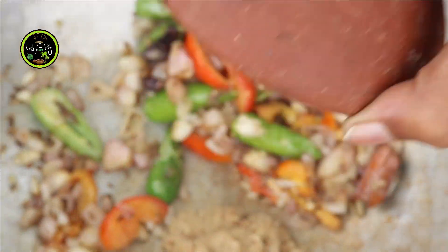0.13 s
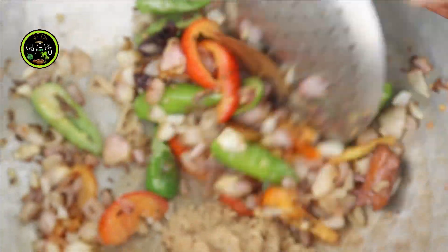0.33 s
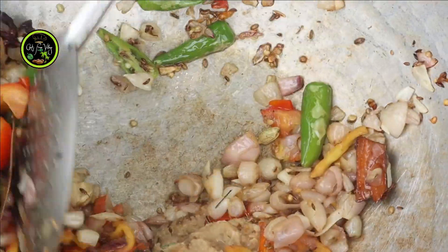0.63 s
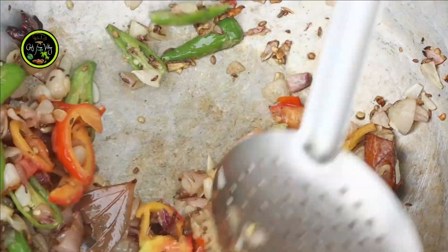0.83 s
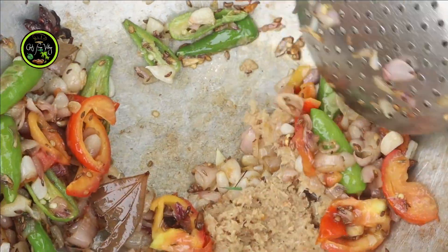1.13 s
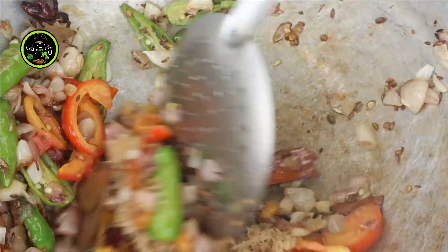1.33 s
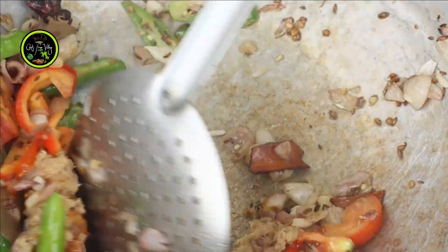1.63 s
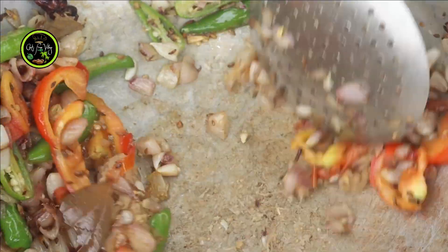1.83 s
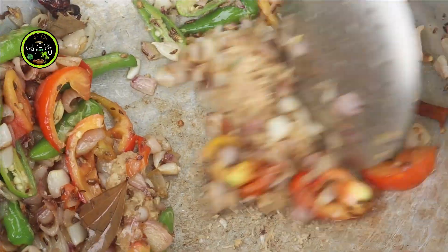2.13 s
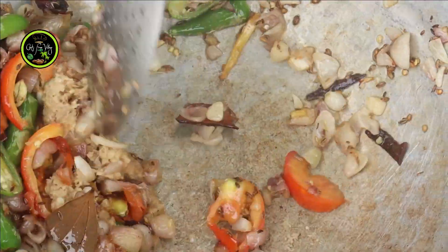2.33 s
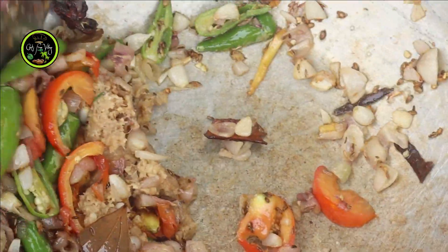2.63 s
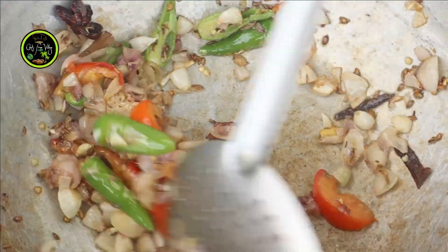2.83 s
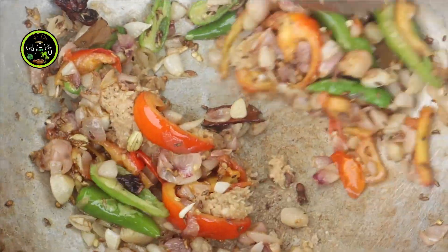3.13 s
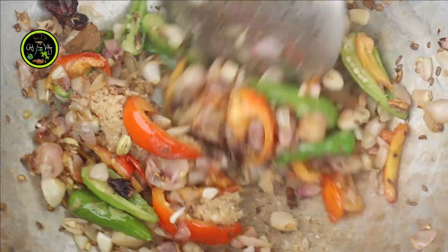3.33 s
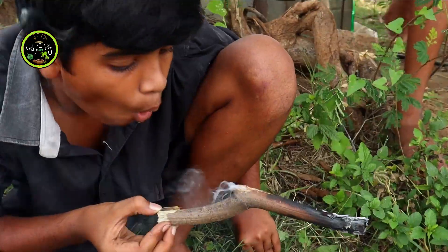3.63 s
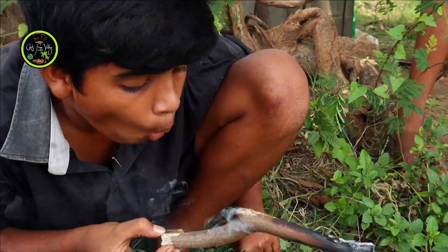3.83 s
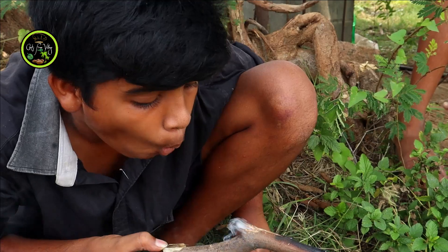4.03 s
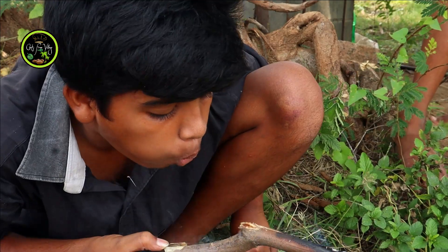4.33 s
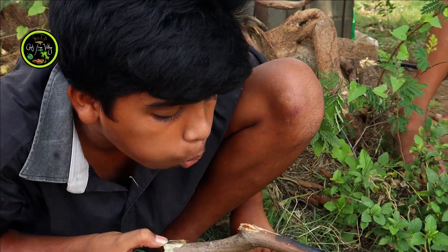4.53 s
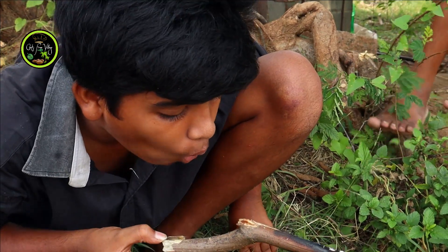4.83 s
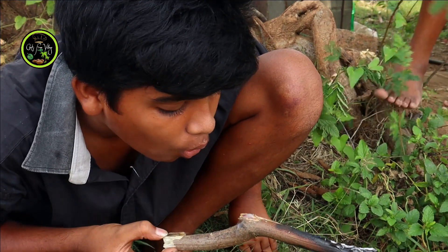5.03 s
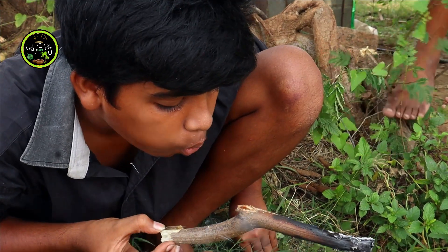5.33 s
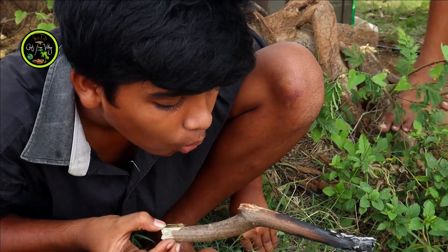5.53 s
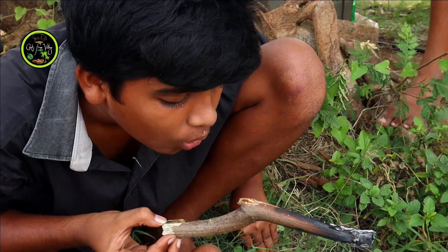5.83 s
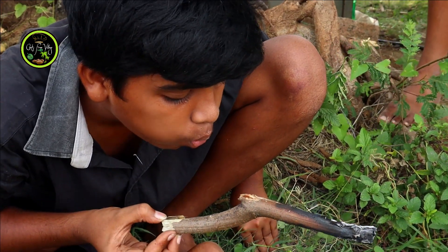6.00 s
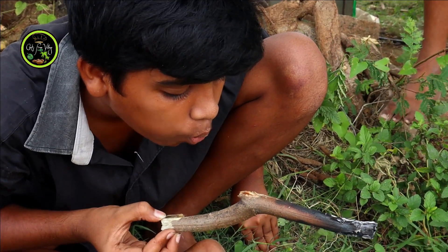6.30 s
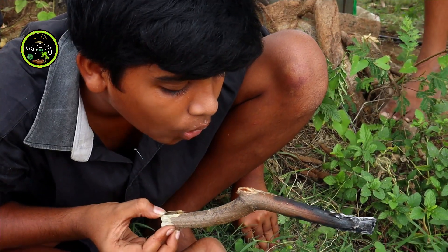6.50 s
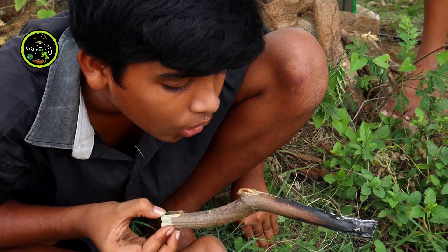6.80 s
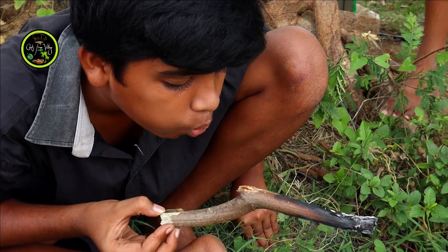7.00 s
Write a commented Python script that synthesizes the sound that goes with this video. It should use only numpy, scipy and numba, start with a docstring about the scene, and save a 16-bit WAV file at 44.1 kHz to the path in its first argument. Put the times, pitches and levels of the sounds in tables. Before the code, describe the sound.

A lively hiss of frying surrounds quick clusters of metallic ladle blows, short scrapes and thin clinks, heard very near in stereo. A hard cut drops to outdoor air, with uneven wind thumping the microphone. Short, rough scrapes on a hollow woody-sounding object come with clicks and dull knocks, then stop. Sparse leaf rustles remain, interrupted by one loud dry snap and a soft thud.

```python
"""Frying pan, then a quiet yard

Close to a phone, vegetables fry in a wide metal pan while a slotted ladle knocks, clinks and drags.
The scene then cuts to a yard: wind on the microphone ports over a soft hiss, something hollow scraped
in short strokes, small ticks, rustling leaves, and a sharp snap followed by a dull thud.
Bubbles, scrapes and leaves are random grains shaped in colour; blows, ticks and snap are decaying tones and noise."""
import sys
import numpy as np
from scipy import signal
from scipy.fft import rfft, irfft, next_fast_len
from scipy.io import wavfile
from scipy.ndimage import uniform_filter1d
from numba import njit

SR = 44100
rng = np.random.default_rng(int(sys.argv[2]) if len(sys.argv) > 2 else 0)


def store_pcm(level_fs):
    """Save levels as 16-bit WAV."""
    pcm = np.round(np.clip(level_fs, -1, 1) * 32767).astype(np.int16)
    wavfile.write(sys.argv[1], SR, np.atleast_2d(pcm).T)


N = 315756
CUT_S = 3.473  # the pan gives way to the yard
T = np.arange(N) / SR
SIZE = next_fast_len(N + 4096)
FREQ = np.maximum(np.arange(SIZE // 2 + 1) * SR / SIZE, 1)

# modes of the pan: (frequency [Hz], level [dB], nominal ring t60 [s])
PAN = [(182, -9.5, 0.03), (244.5, -13.5, 0.18), (426, -50, 0.088), (479, 7.5, 0.042), (608.8, 4, 0.067),
       (691, 2.5, 0.037), (766, 0.5, 0.03), (942, -5.5, 0.026), (1140, -7.5, 0.014), (1414, -8, 0.026),
       (2074, -21, 0.055)]
# resonances of the hollow thing in the yard: (frequency [Hz], nominal width [Hz], level [dB])
HOLLOW = [(323, 320, -5.5), (413.5, 71, 6.5), (476.4, 46, 4), (621, 64, 4), (863, 88, -1.5), (994, 35, -5)]
# left-right likeness of yard sounds: (frequency [Hz], likeness [0 to 1])
YARD_LIKE = [(100, 0.98), (400, 1), (1500, 0.48), (4000, 0.35), (10000, 0.57)]


def undb(db):
    """dB to gain."""
    return 10 ** (np.asarray(db) / 20)


def unit(x):
    """Scales to rms 1."""
    return x / np.sqrt(np.mean(x ** 2))


def curve(rows):
    """Columns of a table over time."""
    s, *columns = np.transpose(rows)
    return [np.interp(T, s, c) for c in columns]


def over_hz(table):
    """A (Hz, value) table on the frequency axis."""
    hz, value = np.transpose(table)
    return np.interp(np.log(FREQ), np.log(hz), value)


def walk(rate):
    """Random levels, rate of them a second, joined by straight slopes; spread near 1."""
    k = int(SR / rate)
    held = np.repeat(rng.standard_normal(N // k + 1), k)
    return uniform_filter1d(held, k)[:N]


def grains(rate, spread_db, bed):
    """Three unrelated streams of random clicks of uneven size, over a bed of noise."""
    size = undb(spread_db * np.minimum(rng.exponential(size=(3, N)), 3))
    struck = rng.random((3, N)) < rate / SR
    clicks = struck * rng.standard_normal((3, N)) * size
    return unit(clicks) + bed * rng.standard_normal((3, N))


def ports(streams, like, lag):
    """Spectra of two ports: a shared stream, late by lag samples on the right, and a private one each."""
    c = np.clip(over_hz(like), 0, 1)
    shared, left, right = rfft(streams, SIZE)
    late = np.exp(-2j * np.pi * FREQ * lag / SR)
    return np.array([np.sqrt(c) * shared + np.sqrt(1 - c) * left,
                     np.sqrt(c) * shared * late + np.sqrt(1 - c) * right])


def colour(spectra, table, flicker_db, rate):
    """Shapes spectra to a (Hz, dB) table; every octave flickers on its own."""
    gain, out, octave = undb(over_hz(table)), 0, np.log2(FREQ / 30)
    for k in range(10):
        band = np.clip(1 - abs(octave - k), 0, 1)
        out = out + undb(flicker_db * walk(rate)) * irfft(spectra * gain * band, SIZE)[:, :N]
    return unit(out)


def ring(x, hz, t60):
    """One decaying mode; a unit impulse rings at size 1."""
    r, w = np.exp(-np.log(1000) / (t60 * SR)), 2 * np.pi * hz / SR
    return signal.lfilter([0, r * np.sin(w)], [1, -2 * r * np.cos(w), r * r], x)


@njit
def svf(x, hz, width):
    """State-variable band-pass with a moving centre, gain 1 there."""
    y, b, l = np.empty(len(x)), 0., 0.
    for i in range(len(x)):
        g, k = np.tan(np.pi * hz[i] / SR), width / hz[i]
        v = (b + g * (x[i] - l)) / (1 + g * (g + k))
        b, l, y[i] = 2 * v - b, l + 2 * g * v, k * v
    return y


def resonate(spectra, modes, flicker_db, rate, wander, wander_rate):
    """Yard noise through steep resonances, each wandering in pitch and coming and going on its own."""
    start = int(CUT_S * SR)
    out, x = np.zeros((2, N)), irfft(spectra, SIZE)[:, start:N]
    for hz, w, db in modes:
        centre = hz * np.exp(wander * walk(wander_rate)[start:])
        gain = undb(db + flicker_db * np.tanh(walk(rate)[start:]))
        # two passes make the slopes steep
        out[:, start:] += gain * np.array([svf(svf(v, centre, 1.3 * w), centre, 1.3 * w) for v in x])
    return unit(out)


def add(out, s, sound, pan_db=0., lag=0):
    """Mixes a short sound in at time s, left louder by pan_db, the right channel lag samples late."""
    for ch, sign in enumerate((.5, -.5)):
        i = int(s * SR) + ch * lag
        part = sound[ch % len(sound), :N - i]
        out[ch, i:i + len(part)] += undb(sign * pan_db) * part


def strokes(rows, attack, release):
    """Each stroke fades in, swells or sags evenly in dB and dies away; one gain for every level column."""
    power = 0
    for s, length, swell_db, *db in rows:
        along = np.clip((T - s) / max(length, .005), 0, 1)
        rise = np.clip((T - s) / np.reshape(attack, (-1, 1)), 0, 1)
        fall = np.exp(-np.maximum(T - s - length, 0) / release)
        shape = rise * undb(swell_db * (along - .5)) * fall
        power = power + (undb(db)[:, None] * shape) ** 2
    return np.sqrt(power)


def radiate(x, hz):
    """Small things send out no deep bass: a high-pass at hz."""
    return signal.sosfilt(signal.butter(4, hz, "high", fs=SR, output="sos"), x)


def swings(rows, pan_db):
    """Each row is one short low swing that builds over a quarter cycle."""
    out, t = np.zeros((2, N)), T[:SR // 4]
    for s, db, hz, fall in rows:
        swing = np.sin(2 * np.pi * hz * t) * np.exp(-t / fall) * (1 - np.exp(-4 * hz * t))
        # the louder side keeps the level of the table
        add(out, s, undb(db - abs(pan_db) / 2) * swing[None] / abs(swing).max(), pan_db, lag=1)
    return radiate(out, 68)


def frying():
    """Thousands of bursting bubbles hiss; stirring throws up coarser spatter."""
    # frying swells as the ladle turns the food: (time [s], hiss [dB], coarser spatter in the mids [dB])
    swells = [(0.0, -24.5, -51), (0.4, -25.5, -38), (0.55, -26.5, -31), (0.98, -23, -29),
              (1.13, -27.5, -32), (1.47, -21.5, -29.5), (1.62, -25.5, -32), (1.82, -22, -29),
              (1.89, -19, -51), (2.22, -23, -21.5), (2.34, -22, -45), (2.58, -24.5, -29.5),
              (2.78, -24.5, -39), (2.92, -26, -22), (3.0, -21, -27), (3.16, -23, -30.5), (3.3, -24, -30.5),
              (3.47, -22.5, -26)]
    # colour of the hiss: (frequency [Hz], density [dB per Hz])
    hiss_colour = [(24, -76.5), (40, -49), (104, -21), (163, -27.5), (382, -21), (479, -8), (733, -13.5),
                   (831, -20.5), (1090, -10.5), (2980, -2.5), (10400, -2.5), (14800, -5.5), (16000, -4)]
    # colour of the spatter: (frequency [Hz], density [dB per Hz])
    spatter_colour = [(900, -21), (1300, -6.5), (1600, -1), (1850, -6), (2150, 1), (2500, -3), (3250, 4),
                      (4000, 3), (5500, -2), (8000, -15.5)]
    # left-right likeness close to the pan: (frequency [Hz], likeness; below 0 counts as 0)
    fry_like = [(60, 0.46), (130, 0.58), (290, 0.89), (640, 0.97), (1410, 0.97), (3100, 0.49), (6820, 0.33),
                (15000, -0.35)]
    hiss_db, spatter_db = curve(swells)
    hiss = colour(ports(grains(4000, 1.4, 0.77), fry_like, 0.79), hiss_colour, 1.0, 8.6)
    spatter = colour(ports(grains(2500, 4.0, 0.57), fry_like, 0.62), spatter_colour, 1.7, 25.08)
    out = undb(hiss_db) * hiss + undb(spatter_db) * spatter
    return out * undb([[-1.2], [1.2]])  # a little louder on the right


def ladle_blows():
    """Blows excite the pan modes nearest the contact pitch, with a thud, a ringing rim and a bright click."""
    # ladle blows: (time [s], level [dB], pitch of the contact [Hz], ring of the rim against the body [dB])
    hits = [(0.4045, -18, 526, -28), (0.553, -16.5, 533, -39), (0.561, -11, 504, -38),
            (0.574, -9.5, 507, -48), (0.586, -15, 476, -37), (0.607, -18, 480, -44), (0.622, -23, 484, -41),
            (0.645, -30, 474, -40), (0.658, -28, 494, -38), (0.67, -19, 496, -38), (0.684, -26, 490, -38),
            (0.697, -27, 480, -38), (0.72, -25, 465, -38), (0.729, -35, 480, -38), (2.1739, -5.5, 524, -24),
            (2.197, -23, 510, -43), (2.205, -13, 510, -42), (2.212, -26, 490, -40), (2.228, -11, 487, -45),
            (2.241, -8.5, 547, -42), (2.254, -18.5, 605, -40), (2.338, -20.5, 238, -19),
            (2.339, -24, 770, -30), (2.353, -21, 254, -28), (2.358, -31, 755, -30), (2.377, -35, 790, -30),
            (2.379, -21, 252, -26), (2.5855, -11, 448, -19), (2.635, -27, 1014, -28),
            (2.761, -39, 509, -30), (2.867, -20, 486, -30), (2.885, -15, 467, -19), (2.975, -12, 437, -28),
            (2.999, -15, 464, -42), (3.309, -14, 531, -12.5), (3.455, -12, 462, -39), (3.46, -47, 460, -38)]
    # modes of the rim: (frequency [Hz], level [dB], ring t60 [s])
    rim_modes = [(1007, -6.5, 0.56), (1730, -25, 0.18)]
    click_db, click_s = -15, 0.002  # first contact
    out, t = np.zeros((2, N)), T[:SR // 2]
    rim = sum(undb(g) * np.sin(2 * np.pi * f * t) * undb(-60 * t / t60) for f, g, t60 in rim_modes)
    for s, db, hz, rim_db in hits:
        tones = 0
        for f, g, t60 in PAN:
            nearness_db = -38 * np.log2(f / hz) ** 2
            tones = tones + undb(g + nearness_db) * np.sin(2 * np.pi * f * t) * undb(-60 * t / t60)
        thud = np.sin(2 * np.pi * hz * t) * np.exp(-t / 0.01)
        click = undb(click_db) * rng.standard_normal(len(t)) * np.exp(-t / click_s)
        body = (0.4 * tones + .5 * thud) * (1 - np.exp(-t / 0.0013))
        blow = body / abs(body).max() + undb(rim_db) * rim + click
        add(out, s, undb(db) * blow[None], lag=1)
    return radiate(out, 260)


def dull_taps():
    """Dull low taps and thumps under the ladle's blows and drags: short low swings."""
    # taps and thumps: (time [s], level before the high-pass [dB], pitch [Hz], fall time [s])
    low_taps = [(0.4163, -17.5, 910, 0.00048), (1.3725, -40, 300, 0.002), (1.543, -48, 150, 0.0054),
                (1.604, -46, 99, .03), (2.18, -47, 105, .02), (2.335, -35, 140, .012),
                (2.755, -34, 188, 0.013), (2.876, -39, 140, .012), (2.968, -39, 150, .01)]
    return swings(low_taps, 0)


def ladle_drag():
    """The ladle dragged over the pan floor slips unevenly and rings the pan modes in three groups."""
    # drags: (time [s], length [s], swell over the stroke [dB], middle modes [dB], low mode group [dB],
    # upper modes [dB])
    drags = [(0.428, 0.063, -2, -38, -55, -44), (0.583, 0.148, -11, -28.5, -66, -43),
             (1.784, 0.03, 6, -37.5, -64, -62), (2.18, 0.071, -1, -20.5, -61, -29),
             (2.336, 0.091, -15, -40, -30.5, -33), (2.587, 0.031, -15, -24.5, -27, -39),
             (2.637, 0.1, 7, -36.5, -45, -43), (2.751, 0.13, -9.5, -34, -35, -38.5),
             (2.869, 0.15, -18, -29, -34, -35.5), (2.973, 0.066, -16, -28.5, -33, -33),
             (3.307, 0.031, -8, -34, -47, -48), (3.424, 0.034, 5, -37, -63, -43)]
    slips = grains(900, 5.5, 1.15)
    both = slips[0] + 0.17 * slips[1:]  # mostly the same slips at both ports
    out = np.zeros((2, N))
    forces = strokes(drags, attack=0.0073, release=0.017)
    for force, lo, hi in zip(forces, (330, 0, 660), (660, 330, SR)):
        group = 0
        for f, g, t60 in PAN:
            if lo < f <= hi:
                mode = unit(ring(ring(both, f, 1.36 * t60), f, 0.036))
                group = group + undb(g + 0.72 * walk(48)) * mode
        out += force * unit(group)
    return radiate(out, 260)


def pan_clicks():
    """Short bright clicks, some on the ladle blows: decaying noise tilted to the treble."""
    # clicks: (time [s], level before a small left-right tilt [dB])
    bright_clicks = [(0.564, -20), (1.2714, -31), (1.2924, -26), (1.3314, -30), (1.3358, -23),
                     (2.5835, -25), (2.636, -15), (3.4565, -28)]
    out, t = np.zeros((2, N)), np.arange(300) / SR
    for s, db in bright_clicks:
        bright_noise = np.diff(rng.standard_normal((1, 301)))
        add(out, s, undb(db) * bright_noise * np.exp(-t / 0.0025))
    return out * undb([[-1.2], [1.2]])


def ladle_clinks():
    """The thin ladle edge clinks: a noise burst through a ringing mode."""
    # clinks: (time [s], level [dB], pitch [Hz], ring t60 of the mode [s])
    edge_clinks = [(1.434, -24, 2190, 0.068), (1.436, -27, 1600, 0.034), (1.475, -27, 2160, 0.077),
                   (1.463, -30, 3300, .02), (2.244, -20, 2030, .02), (2.338, -27, 2020, .05),
                   (2.337, -28, 1380, 0.013), (2.362, -28, 2060, .03), (2.584, -20, 3420, .004),
                   (2.583, -14.5, 4940, .004), (2.6337, -17, 3680, 0.0036), (2.973, -24, 3100, .004),
                   (3.456, -10.5, 3430, 0.0036), (3.4578, -10, 2200, 0.007)]
    out, t = np.zeros((2, N)), T[:SR // 2]
    for s, db, hz, t60 in edge_clinks:
        burst = rng.standard_normal(len(t)) * np.exp(-t / 0.0063)
        clink = ring(ring(burst, hz, t60), hz, 0.0029)
        add(out, s, undb(db) * clink[None] / abs(clink).max(), -1.2, lag=1)
    return radiate(out, 260)


def wind():
    """Wind on the microphone ports: each is buffeted on its own in the deep bass, more alike above."""
    # gusts: (time [s], level [dB], left minus right [dB])
    gusts = [(3.53, -40, 19), (3.66, -51, 3), (4.07, -42.5, 4), (4.16, -52, 2), (4.3, -38, 18),
             (4.55, -39, -5), (4.8, -39, -1), (4.92, -52, -11), (5.06, -47.5, 9), (5.22, -34, 0),
             (5.34, -53, -1), (5.87, -48, 4), (5.97, -34, -6), (6.27, -53.5, -16), (6.385, -34, 19),
             (6.53, -45, 6), (7.0, -50.5, 2), (7.16, -36, 17)]
    # colour of the wind: (frequency [Hz], density [dB per Hz])
    gust_colour = [(12, -53), (20, -48), (53, 4.5), (155, -5), (192, -11), (426, -25.5), (471, -35),
                   (600, -49.5), (780, -74), (1320, -120)]
    db, pan_db = curve(gusts)
    buffets = colour(ports(grains(200, 1, 0.61), [(60, 0.11), (200, 0.98)], 0), gust_colour, 1.0, 23)
    return undb(db + np.array([pan_db, -pan_db]) / 2) * buffets


def yard_hiss():
    """A soft hiss, wide in the treble: coloured noise whose level and treble drift."""
    # drift of the hiss: (time [s], level before a small left-right tilt [dB], treble lift [dB])
    drift = [(3.5, -42, 5.5), (4.2, -45.5, 0), (5.3, -42.5, 0), (5.95, -41, -6), (6.5, -44.5, -5),
             (7.16, -46, -3)]
    # colour of the hiss: (frequency [Hz], density before the treble lift [dB per Hz])
    air_colour = [(120, -25), (200, -4), (294, -26), (322, -5), (933, -5), (1350, -4.5), (2170, -4),
                  (2800, -3.5), (9400, -10), (16000, -11)]
    noise = rng.standard_normal((3, N))
    hiss = colour(ports(noise, [(300, 0.94), (3000, 0.021)], 0), air_colour, 0.96, 27)
    hiss_db, treble_db = curve(drift)
    treble_share = np.clip(over_hz([(3500, 0.026), (9000, 1.0)]), 0, 1)
    treble = irfft(rfft(hiss, SIZE) * treble_share, SIZE)[:, :N]
    hiss = hiss + (undb(treble_db) - 1) * treble
    return undb(hiss_db + np.array([[1.5], [-1.5]])) * hiss


def ticks():
    """Light ticks: a decaying noise burst through two equal short resonances."""
    # ticks: (time [s], level [dB], pitch [Hz])
    small_ticks = [(3.512, -23, 3530), (3.511, -31, 2500), (3.5253, -38, 1710), (3.567, -30.5, 1480),
                   (3.584, -32.5, 1370), (3.886, -40, 4030), (4.0387, -38, 3850), (4.298, -29, 3000),
                   (4.4576, -22, 2540), (4.491, -18, 2580), (4.775, -19, 1580), (4.817, -12.5, 2550),
                   (4.85, -16, 860), (4.924, -28, 1600), (4.966, -22.5, 2560), (5.018, -30, 1590),
                   (4.968, -27, 452), (5.194, -17, 1750), (5.196, -11, 2800), (5.3417, -25, 1850),
                   (5.597, -22, 2670), (5.77, -42, 3400), (5.875, -19, 2700), (5.9048, -10.5, 2730)]
    burst_t60_s, ring_t60_s = 0.088, 0.0097
    out, t = np.zeros((2, N)), T[:SR // 4]
    for s, db, hz in small_ticks:
        burst = rng.standard_normal(len(t)) * undb(-60 * t / burst_t60_s)
        tick = ring(ring(burst, hz, ring_t60_s), hz, ring_t60_s)
        add(out, s, undb(db) * tick[None] / abs(tick).max(), 1.5, lag=6)
    return radiate(out, 140)


def knocks():
    """Dull knocks on the hollow thing: a short thud and the ring of its resonances."""
    # knocks: (time [s], level [dB], pitch [Hz])
    dull_knocks = [(3.886, -28, 427), (4.458, -10.5, 365), (4.804, -12, 400), (4.869, -11, 413),
                   (5.046, -25, 426), (5.149, -24, 382), (5.238, -3.5, 435), (5.574, -13.5, 400),
                   (5.625, -17, 410), (5.856, -14, 483), (5.907, -10, 387), (5.955, -13.5, 433),
                   (6.866, -10.5, 373)]
    out, t = np.zeros((2, N)), T[:SR // 4]
    for s, db, hz in dull_knocks:
        thud = np.sin(2 * np.pi * hz * t) * np.exp(-t / 0.0065)
        tones = sum(undb(g) * np.sin(2 * np.pi * f * t) * np.exp(-np.pi * w * t) for f, w, g in HOLLOW)
        soft_contact = (1 - np.exp(-t / 0.00078)) ** 2  # builds over the first cycle
        body = (thud + 0.26 * tones) * soft_contact
        add(out, s + 0.00191, undb(db) * body[None] / abs(body).max(), 1.3, lag=10)
    return radiate(out, 140)


def scraping():
    """Rough contact slips: coarse slips ring the hollow body, grit rasps and rings its wall, dust hisses on top."""
    # scraping strokes: (time [s], length [s], swell over the stroke [dB], hollow body [dB], grit [dB],
    # ringing wall [dB], fine dust [dB])
    scrapes = [(3.888, 0.16, 17, -37.5, -51, -59, -49.5), (4.19, 0.11, 8.5, -40.5, -51, -61, -47),
               (4.355, 0.108, 10, -32.5, -37.5, -46, -43.5), (4.455, 0.048, -4, -37, -27.5, -38, -39),
               (4.51, 0.3, 9.5, -33, -29, -41, -43.5), (4.765, 0.098, 3, -29.5, -28.5, -36, -35.5),
               (4.922, 0.057, -2.5, -33.5, -35, -42, -42.5), (4.995, 0.053, 1, -31, -36, -36, -37.5),
               (5.145, 0.057, 12, -30.5, -36.5, -39, -35.5), (5.215, 0.039, 1.5, -29, -35, -31.5, -35),
               (5.322, 0.14, -7, -37, -40.5, -37, -43), (5.485, 0.13, 2.5, -33, -49.5, -41.5, -42.5),
               (5.68, 0.058, 9, -33, -45, -38, -43), (5.735, 0.13, -3, -39, -39.5, -56, -50),
               (5.84, 0.067, 6, -29, -33, -31.5, -32.5), (5.9, 0.06, 1, -34.5, -40, -34.5, -46)]
    # resonances of the wall: (frequency [Hz], nominal width [Hz], level [dB])
    wall_modes = [(1660, 310, 7.5), (2220, 330, 4.5), (2696, 250, 4), (3310, 190, 1), (4280, 630, -10.5),
                  (4870, 250, -3)]
    # the body speaks first, the brighter layers follow
    attack_s, release_s = (0.0083, 0.03, 0.021, 0.011), 0.025
    body_gain, grit_gain, wall_gain, dust_gain = strokes(scrapes, attack_s, release_s)
    chatter = undb(1.2 * walk(90))  # the contact skips, all layers together
    body = resonate(ports(grains(800, 0.99, 1.0), YARD_LIKE, 12.3), HOLLOW, 6.4, 35, 0.028, 11)
    rough = ports(grains(3000, 3.5, 0.64), YARD_LIKE, 9.9)
    rasp = colour(rough, [(600, -7.5), (1000, 1.0), (2000, -4), (3900, -2), (4400, -13),
                          (6300, -14.0), (7500, -41)], 1.3, 19)
    wall = resonate(rough, wall_modes, 4, 30, .05, 16)
    dust = colour(rough, [(5000, -6.5), (7000, -2.0), (11000, -6), (16000, -19)], 0.11, 23)
    layers = body_gain * body + grit_gain * rasp + wall_gain * wall + dust_gain * dust
    return chatter * layers * undb([[1.2], [-.4]])


def wind_thumps():
    """Puffs of wind thump the left port as short low swings."""
    # puffs: (time [s], level at the left port [dB], pitch [Hz], fall time [s])
    puffs = [(4.253, -24, 127, .006), (4.3, -24, 138, 0.005), (4.362, -19, 120, 0.0049),
             (4.395, -23, 137, 0.0052), (6.37, -13, 130, 0.0034), (6.386, -12.5, 152, 0.0031),
             (6.414, -21, 120, 0.0052)]
    return swings(puffs, 21)


def specks():
    """Dry specks crack under the scraping as tiny noise bursts."""
    # specks: (time [s], level [dB])
    dry_specks = [(4.7074, -33), (4.776, -21), (5.0173, -18), (5.045, -15), (5.183, -24), (5.1958, -24),
                  (5.34, -20), (4.653, -18), (4.815, -21), (4.872, -26), (5.905, -14), (5.7151, -31)]
    out, t = np.zeros((2, N)), T[:SR // 4]
    for s, db in dry_specks:
        speck = rng.standard_normal(len(t)) * np.exp(-t / 0.0022)
        add(out, s, undb(db) * speck[None] / abs(speck).max(), 1.5, lag=10)
    return radiate(out, 140)


def rustle():
    """Leaves rustle underfoot: dense small dry grains in short strokes."""
    # rustles: (time [s], length [s], swell over the stroke [dB], level before a small left-right tilt [dB])
    steps = [(6.075, 0.071, -1, -34), (6.42, 0.069, -0.5, -35), (6.565, .03, -7, -44),
             (6.7, 0.066, 11, -44.5), (7.075, 0.075, 3, -39)]
    # colour of the leaves: (frequency [Hz], density [dB per Hz])
    leaf_colour = [(180, -1), (300, -3.5), (462, -5.5), (713, -4.5), (1640, -5), (1970, -6), (3400, -9),
                   (16000, -30.5)]
    leaves = colour(ports(grains(3500, 1.3, 0.81), YARD_LIKE, 2.8), leaf_colour, 1.2, 19)
    return strokes(steps, attack=0.031, release=0.043)[0] * leaves * undb([[1.5], [-.8]])


def snap():
    """One sharp snap: ringing tones, a burst of noise, bright splinters and a duller tail."""
    # tones of the snap: (frequency [Hz], relative level [dB], ring t60 [s])
    snap_modes = [(444, 1.5, 0.089), (1005, 7.5, 0.068), (1465, 10, 0.022), (2310, -22, 0.16),
                  (2430, -23, 0.23), (2840, -32, 0.082), (3300, -28, 0.088)]
    snap_s, snap_db = 6.776, -1
    out, t = np.zeros((2, N)), T[:SR // 4]
    tones = 0
    for f, g, t60 in snap_modes:
        decay = undb(-60 * t / t60) + 3.7 * np.exp(-t / 0.0033)  # strong start, then the ring
        tones = tones + undb(g) * np.sin(2 * np.pi * f * t) * decay
    noise = rng.standard_normal((2, len(t)))
    splinters = unit(ring(noise, 4400, 0.0067)) * np.exp(-t / 0.0037)
    # echoes off the ground, dull on top
    echoes = unit(ring(noise, 2000, 0.00033)) * (0.38 * np.exp(-t / 0.012) + 0.026 * np.exp(-t / 0.036))
    crack = 3.4 * noise * np.exp(-t / 0.00051) + 0.51 * splinters + echoes
    add(out, snap_s, undb(snap_db) * (0.063 * tones + 0.59 * crack), 1.1, lag=10)
    return radiate(out, 140)


def scene():
    """The pan up to the cut, the yard after it."""
    before = np.clip((CUT_S - T) / 0.00091, 0, 1)
    pan = frying() + ladle_blows() + dull_taps() + ladle_drag() + pan_clicks() + ladle_clinks()
    air = wind() + yard_hiss() + wind_thumps()
    handled = ticks() + knocks() + scraping() + specks() + rustle() + snap()
    return before * pan + (1 - before) * (air + handled)


def record(dry):
    """The phone clips just under full scale and cuts the top above 15.9 kHz."""
    clipped = np.clip(dry, -.96, .96)
    return signal.sosfilt(signal.ellip(10, .2, 70, 15900, fs=SR, output="sos"), clipped)


dry = scene()
out = record(dry)
store_pcm(out)
```